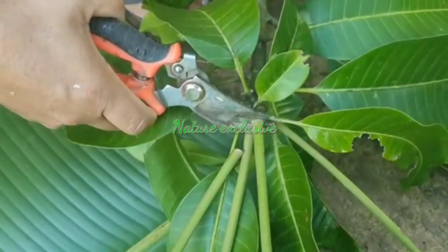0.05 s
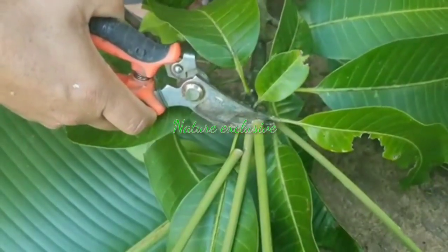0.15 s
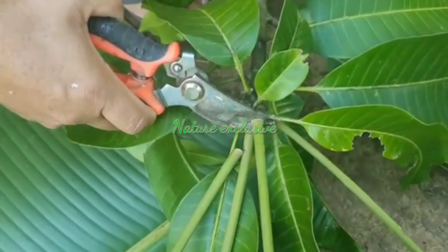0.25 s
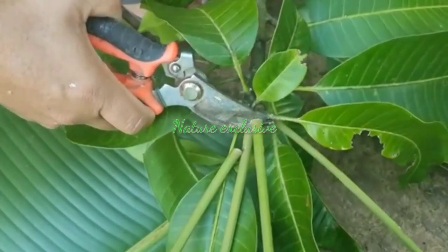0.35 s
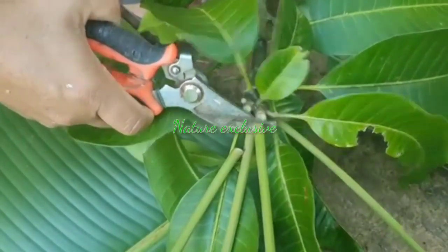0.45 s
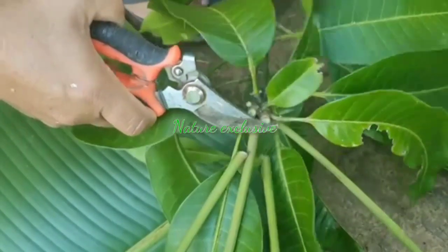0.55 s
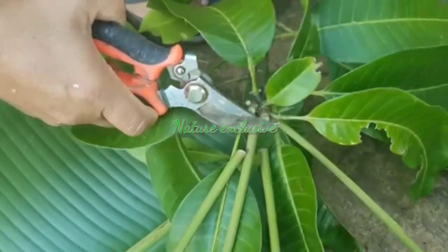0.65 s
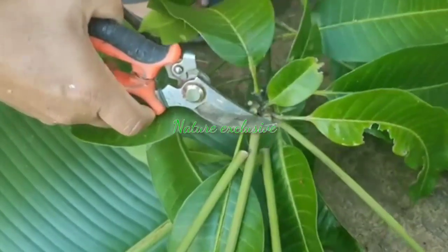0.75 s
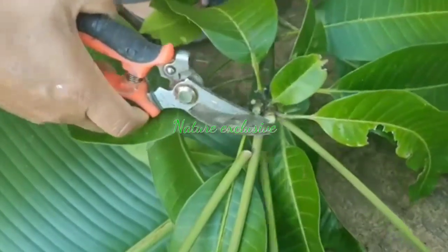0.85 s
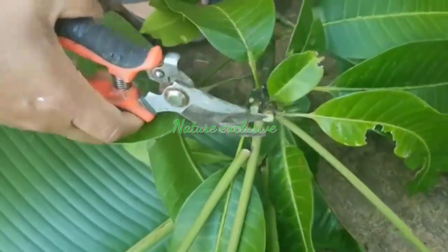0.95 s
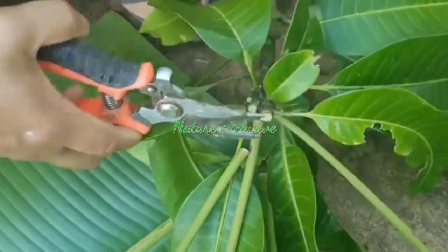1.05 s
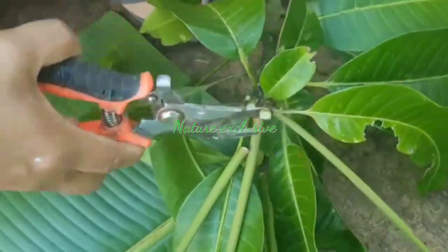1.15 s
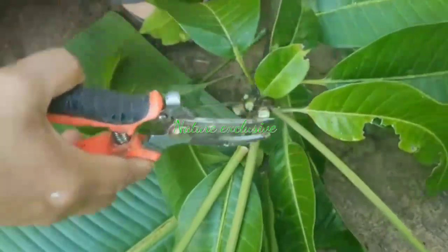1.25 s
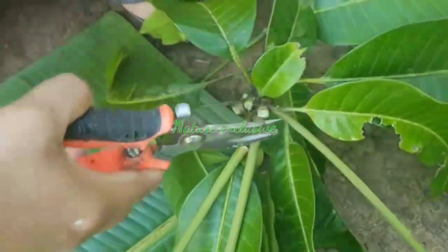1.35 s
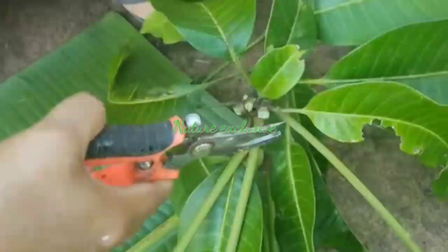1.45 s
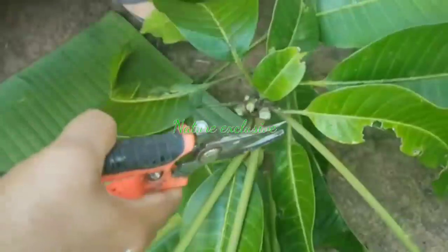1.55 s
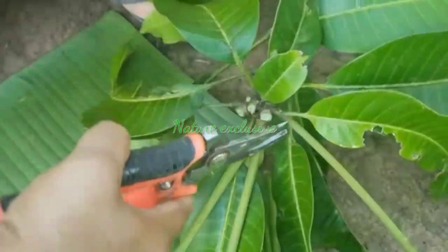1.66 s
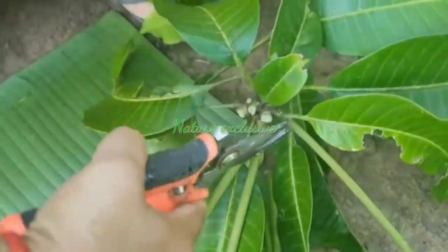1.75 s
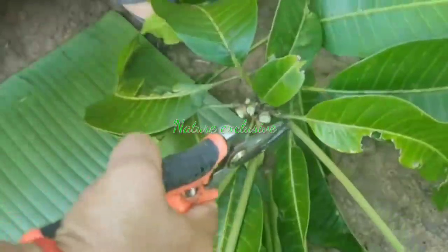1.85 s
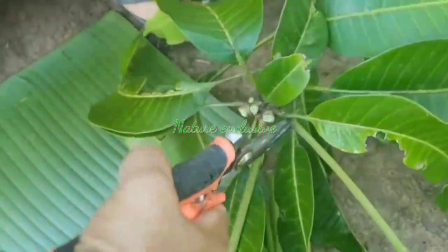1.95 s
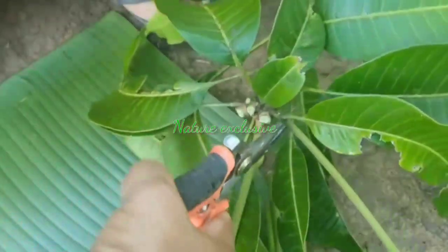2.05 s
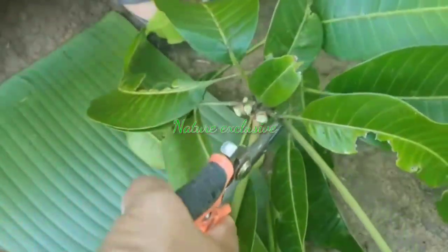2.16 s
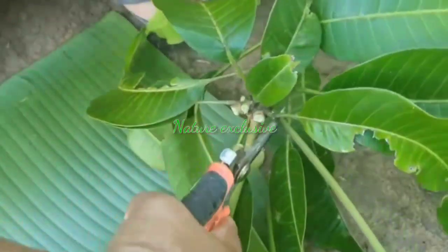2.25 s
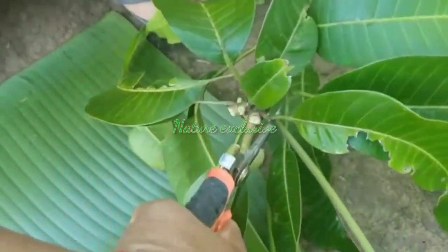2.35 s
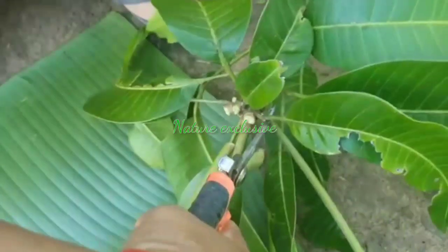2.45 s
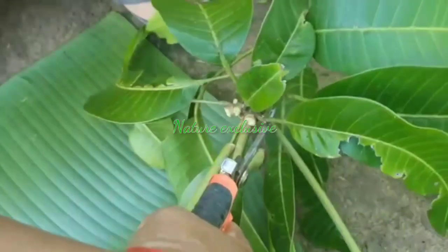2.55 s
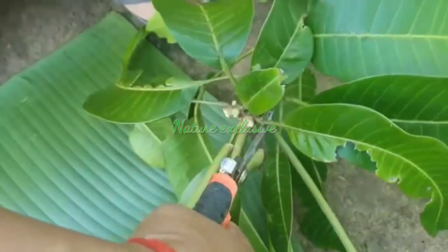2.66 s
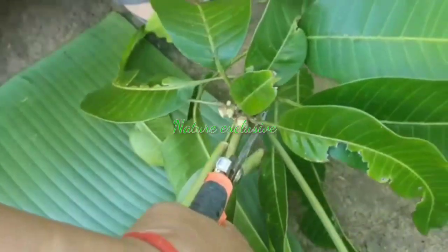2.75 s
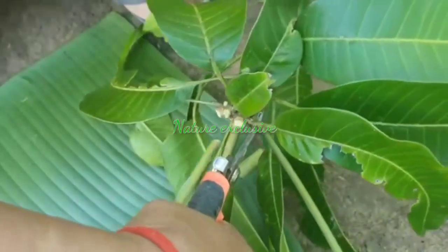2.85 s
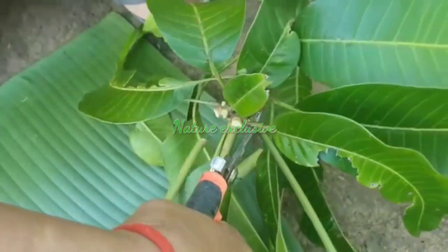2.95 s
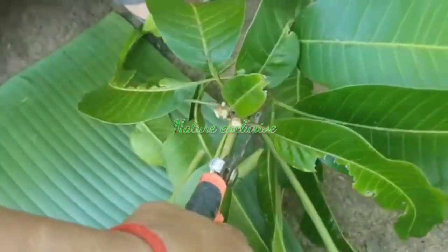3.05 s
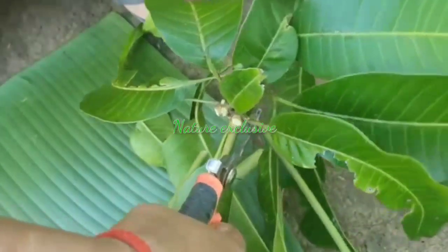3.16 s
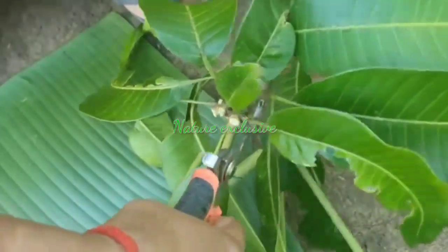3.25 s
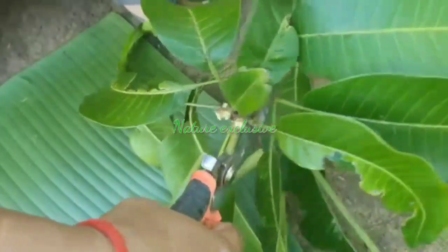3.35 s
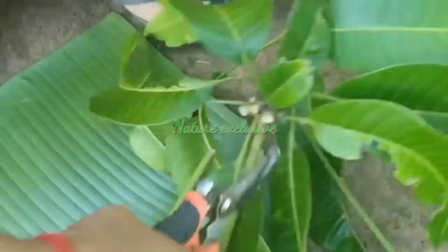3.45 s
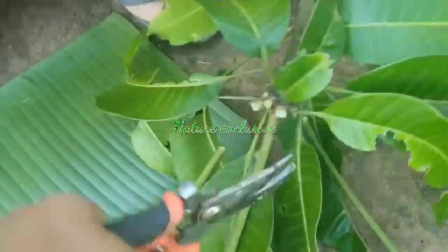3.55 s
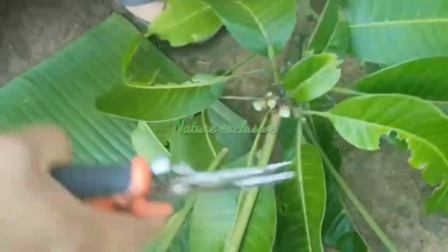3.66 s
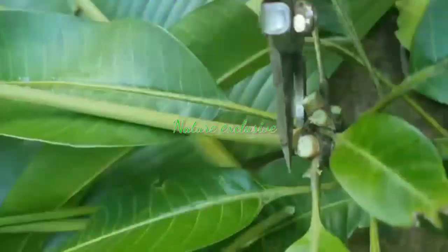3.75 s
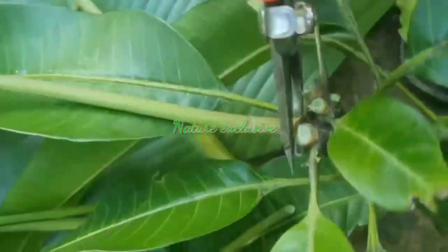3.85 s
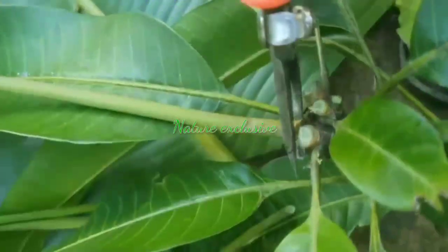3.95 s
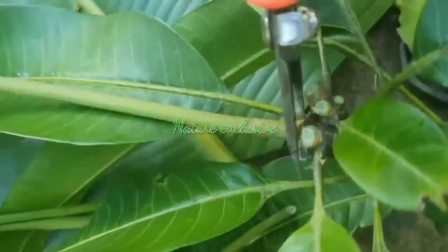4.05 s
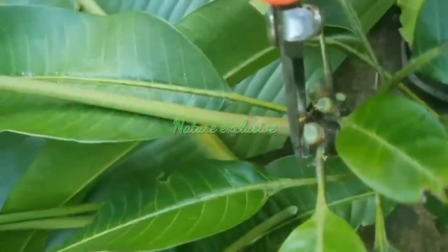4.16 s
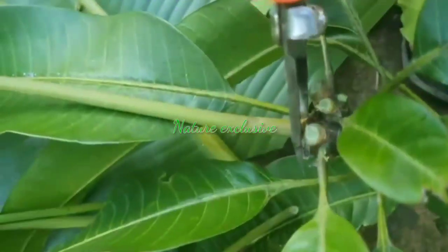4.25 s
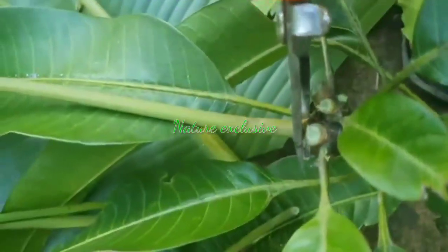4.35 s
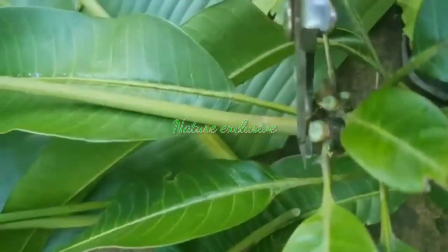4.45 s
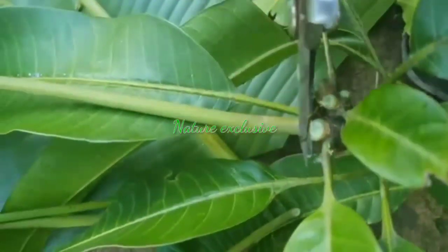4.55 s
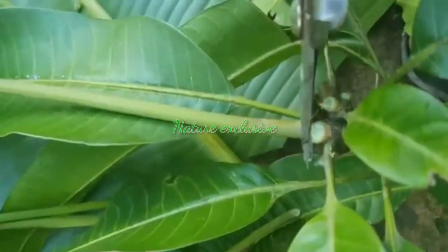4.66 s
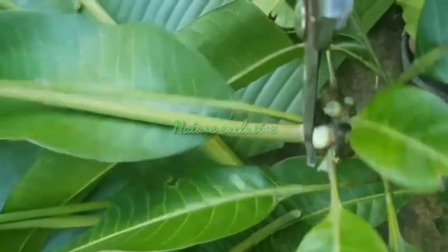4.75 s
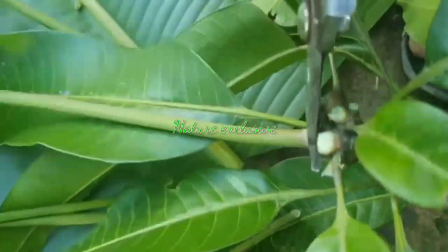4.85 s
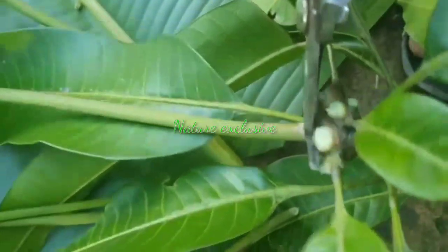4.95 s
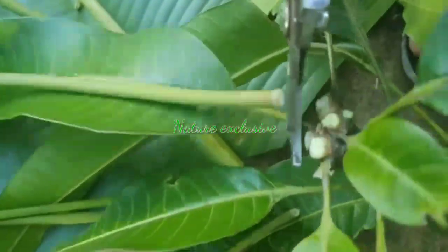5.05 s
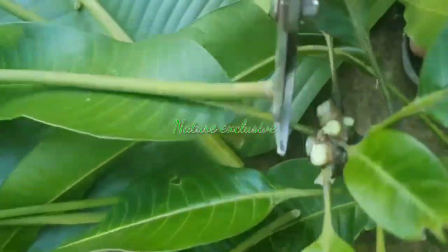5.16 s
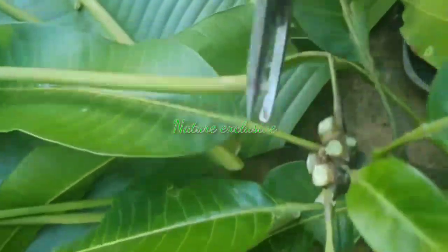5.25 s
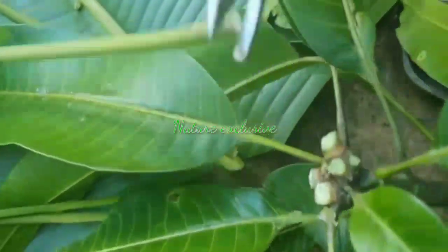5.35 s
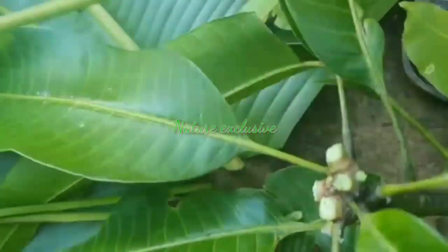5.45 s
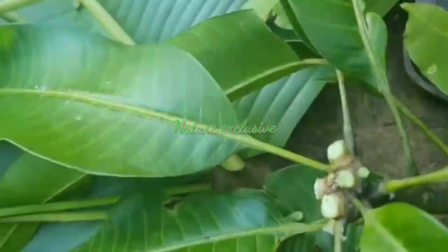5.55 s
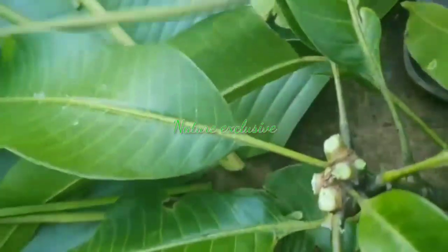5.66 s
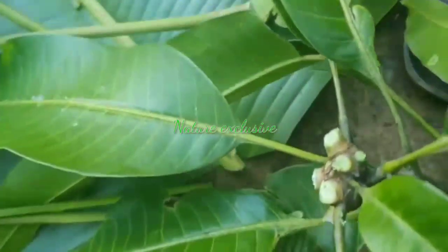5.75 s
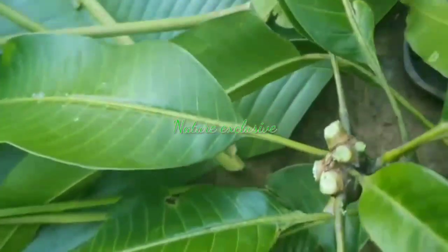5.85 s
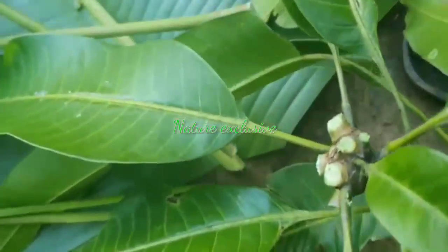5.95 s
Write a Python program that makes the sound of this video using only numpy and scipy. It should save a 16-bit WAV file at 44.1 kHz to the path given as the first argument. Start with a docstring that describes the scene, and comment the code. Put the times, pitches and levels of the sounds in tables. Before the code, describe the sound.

In an open garden, a low traffic rumble, soft air and a high insect shimmer run throughout. Two crickets pulse about five double chirps a second, near 8 kHz, with short pauses; the nearer one swells around 4 to 5.5 seconds. Small birds give quick falling slurs and thin whistles, busiest in the first four seconds, with a slight outdoor echo. At 0.56 shears crunch and snap a juicy stalk, and leaves rustle briefly. A soft thud comes near 1.0. A faint distant motorbike rises in pitch from 1.6 to 3.2. Branch knocks at 2.8 and 3.1 precede a loud, dry snap at 3.3, followed by leaf ticks and rustling until about 4. From 3.9 a far engine drones low and unevenly. A weak, longer crunch at 4.88 leads to a crisp snap at 5.09, then rustling, flicking leaves and a dull branch knock near 5.8.

```python
"""In a garden, pruning shears cut juicy leaf stalks close by: bursts of tiny impulses crush, snap and knock.
Leaves rustle as random grains of noise, and a nudged branch gives dull noise knocks.
Small birds whistle and two crickets chirp with gliding sine tones; shaped noise makes insects, air and traffic.
Far engines, a motorbike, a thin tone and soft handling thuds are sine waves with an unsteady pitch."""
import sys
import numpy as np
from scipy import signal
from scipy.fft import rfft, irfft, next_fast_len
from scipy.io import wavfile
from scipy.ndimage import uniform_filter1d, map_coordinates

SR = 44100
rng = np.random.default_rng(int(sys.argv[2]) if len(sys.argv) > 2 else 0)


def digitize_waveform(pressure):
    """Quantize a signal to 16-bit integers and store it at the path in sys.argv[1].

    Rows of a 2-D input are taken as channels; values are limited to [-1, 1].
    """
    field = np.atleast_2d(pressure).T
    bounded = np.clip(field, -1, 1)
    quanta = np.round(bounded * 32767).astype(np.int16)
    wavfile.write(sys.argv[1], SR, quanta)


N = 264600  # length in samples

# Stalks giving way. Each row: snap in seconds, level in dB, crush length in seconds, crush in dB against
# the snap, snap fall by 60 dB in seconds, knock in dB against the snap, left over right in dB.
STALK_CUTS = [(0.5637, -15.5, 0.0033, -9, 0.017, -19, 1.5), (3.3112, -9.5, 0.0015, -16, 0.018, -24.5, 1),
              (4.8765, -26, 0.00554, -3.5, 0.043, -10.5, 2.5),
              (5.086, -10, 0.003, -11.5, 0.015, -28.5, -0.5)]
# The colour of each of those stalks, one list per cut. Each row: frequency in Hz, shape in dB per Hz.
STALK_COLOURS = [
    [(120, -52), (200, -21.5), (671, -5), (1130, -18), (1540, -1.5), (1850, -14.5), (2510, -20),
     (3120, -8.5), (3670, -15), (4160, -2.5), (4720, -17.5), (5170, -13), (6420, -16), (10100, -5.5),
     (15000, -19.5)],
    [(120, -17), (250, -4), (591, -20), (980, 0), (1330, -9.5), (1690, 0.5), (2420, -20), (3170, -9.5),
     (4010, -8), (4310, -7), (5170, -7.5), (5760, 1.5), (7420, -5), (10800, 1.5), (15000, -10)],
    [(120, -28), (200, -3), (390, -31), (721, 1), (1110, -9.5), (1880, 1.5), (2210, -12), (3060, -12.5),
     (3800, -11), (4240, -16.5), (7970, -14), (12100, -16), (15000, -19)],
    [(120, -37), (200, -5), (683, -8), (946, -22), (1330, -5), (2460, -12.5), (3170, -6.5), (4090, -11),
     (4470, -2), (5660, -4), (6190, -11), (7420, -3), (9050, -11), (10500, 0.5), (15000, -9)],
]
# Broad peaks in the tone of every cut, strong and slight, each standing on a flat floor.
# Each row: frequency in Hz, width in Hz, height above the floor as a gain in dB.
CUT_PEAKS = [(655, 75, 5.5), (1477, 910, -9.5), (3160, 800, 7.5), (4160, 290, 0), (5670, 280, -17),
             (9800, 1460, -29)]
# Colour of the jolted plant. Each row: frequency in Hz, shape in dB per Hz.
KNOCK_COLOUR = [(30, -14), (70, 8.5), (220, 0), (380, 3.5), (800, -5), (1600, -11), (4000, -6),
                (14000, -15.5)]
# Small snaps of leaves and blade taps. Each row: start in seconds, snap in dB, flap in dB, before the trims.
LEAF_TICKS = [(0.579, -39, -45), (0.883, -39, -64), (2.582, -41, -59), (3.11, -39, -49.5),
              (3.124, -41, -36), (3.1452, -32, -30.5), (3.167, -47, -39), (3.3233, -42, -31.5),
              (3.442, -40, -38), (3.4813, -39, -41), (3.49, -34, -33), (3.504, -41, -49),
              (3.5557, -40, -46.5), (3.6441, -34.5, -43), (3.6633, -33.5, -43.5), (3.908, -45.5, -47),
              (3.941, -36, -48.5), (4.905, -35, -32), (4.962, -39, -52), (5.251, -55, -40),
              (5.2882, -37.5, -52), (5.383, -54, -37), (5.6628, -32.5, -45), (5.757, -50, -33.5),
              (5.7823, -41, -37), (5.7884, -47, -32.5), (5.827, -59, -47)]
# Colour of flapping leaf blades. Each row: frequency in Hz, shape in dB per Hz.
FLAP_COLOUR = [(150, -9.5), (350, -3.5), (700, 1), (1600, 0.5), (2800, -5.5), (5000, -15.5), (10000, -54)]
# Colour of crackling leaf edges. Each row: frequency in Hz, shape in dB per Hz.
CRACKLE_COLOUR = [(800, -24), (2500, 4.5), (4000, 2.5), (6000, 1.5), (9000, -2.5), (12000, 2.5),
                  (15000, -3.5)]
# A leaf is pushed, slides and comes to rest. Each row: peak in seconds, rise and fall over 20 dB in
# seconds, flap in dB, crackle in dB, before the trims.
LEAF_RUSTLES = [(.585, 0.02, 0.13, -46.5, -48), (.645, 0.068, 0.17, -49, -55.5),
                (.70, 0.034, 0.11, -52.5, -56.5), (1.03, 0.14, 0.21, -58.5, -68),
                (3.145, 0.061, 0.054, -48, -55.5), (3.28, 0.2, 0.018, -62.5, -57.5),
                (3.34, 0.018, 0.17, -59, -70), (3.499, 0.148, 0.11, -48.5, -47),
                (3.62, 0.23, 0.33, -55, -59.5), (3.955, 0.091, 0.25, -53.5, -58.5),
                (4.53, 0.039, 0.072, -63.5, -57.5), (4.62, 0.12, 0.13, -58.5, -73),
                (4.896, 0.0136, 0.19, -44, -45.5), (4.96, 0.14, 0.065, -51, -56),
                (5.115, 0.0165, 0.16, -52, -58), (5.27, 0.099, 0.19, -53.5, -57),
                (5.4, 0.0415, 0.042, -45.5, -53.5), (5.675, 0.18, 0.061, -52.5, -49.5),
                (5.793, 0.048, 0.0241, -49, -46.5)]
BRUSH_DB = -72.5  # leaves brushed by the arm all along
# The tool bumps a branch. Each row: start in seconds, peak of the envelope in dB.
BRANCH_BUMPS = [(2.799, -48.5), (3.121, -45.5), (5.785, -41)]
# Colour of the bumped branch. Each row: frequency in Hz, shape in dB per Hz.
BRANCH_COLOUR = [(40, -24), (100, -16), (250, 1), (420, 1), (800, -14), (2000, -52)]
# Soft handling thuds. Each row: peak in seconds, length in seconds, level in dB.
HANDLING_THUDS = [(.2, 0.092, -53), (.49, 0.15, -47.5), (.98, 0.089, -40.5), (2.87, 0.11, -45.5),
                  (3.35, 0.13, -54)]
THUD_HZ = 65

# Quick falling bird slurs. Each row: start in seconds, length in seconds, end pitch in Hz, lateness of
# the swell (1 peaks midway), level in dB before the bird trim.
BIRD_SLURS = [(0.058, 0.045, 2400, 1.4, -52.5), (0.263, 0.04, 2080, 0.95, -58),
              (0.601, 0.088, 2494, 1.8, -52), (0.775, 0.039, 2320, 2, -50), (0.911, 0.093, 1920, 1.46, -51),
              (0.939, 0.05, 2600, 0.81, -53.5), (1.457, 0.048, 2430, 1.3, -58),
              (1.605, 0.067, 2070, 0.96, -55), (1.932, 0.12, 2175, 1.9, -50),
              (2.219, 0.082, 2060, 1.63, -47.5), (2.579, 0.078, 3075, 1.3, -57),
              (2.779, 0.034, 3630, 0.88, -54), (2.844, 0.064, 3000, 1.7, -51),
              (3.635, 0.1, 2087, 2.3, -48.5)]
SLUR_TOP_HZ = 4750  # every slur starts here
# Slow whistles that hold, then sag. Each row: start in seconds, length in seconds, pitch in Hz, sag as a
# share of the pitch, level in dB before the bird trim.
BIRD_WHISTLES = [(-.04, 0.11, 3270, 0.11, -60), (-.03, .11, 2166, 0.21, -62),
                 (0.189, 0.085, 3265, 0.033, -57.5), (.28, 0.11, 3145, 0.21, -62.5),
                 (0.471, 0.076, 3450, 0.073, -62.5), (1.436, 0.1386, 3166, 0.032, -60),
                 (1.553, 0.079, 3134, 0.12, -58.5), (1.428, 0.044, 4450, .09, -65),
                 (1.756, 0.08, 4620, 0.025, -62), (1.812, 0.12, 3404, 0.24, -59),
                 (1.99, 0.18, 4120, 0.23, -65), (2.289, 0.061, 4250, 0.063, -57.5),
                 (2.354, 0.054, 3750, 0.21, -58), (2.485, 0.11, 4656, 0.091, -61),
                 (2.607, 0.062, 3294, 0.018, -56), (2.754, 0.12, 4550, 0.052, -58),
                 (2.892, 0.19, 3260, 0.11, -63.5), (3.235, 0.107, 3283, 0.0196, -62),
                 (3.356, 0.089, 3310, 0.27, -52), (3.736, 0.13, 4315, 0.17, -59),
                 (3.854, .062, 3570, 0.11, -54), (3.947, 0.084, 4290, 0.014, -59.5),
                 (4.049, 0.055, 3406, 0.043, -49.5), (4.772, 0.098, 3205, 0.0085, -61),
                 (5.124, 0.097, 3443, 0.057, -58), (5.301, 0.022, 3560, 0.023, -50),
                 (5.836, 0.18, 3224, 0.22, -59)]
WHISTLE_BEND = 1.7  # power of time by which the pitch sags
BIRD_WAVER, BIRD_RASP = .007, .016  # unsteadiness as a share of the pitch: always, and added on slides
BIRD_TRIM_DB = -1.5
BIRD_ECHO_DB = -8  # the birds sit farther off than the crickets, so the yard answers them more

# The near cricket's evenly spaced double chirps. Each row: first chirp in seconds, last chirp in seconds.
NEAR_RUNS = [(.079, .691), (.936, 1.546), (1.878, 1.878), (2.036, 2.242), (2.53, 2.53), (2.775, 3.178),
             (3.638, 3.838), (4.023, 5.83)]
# The same for its neighbour. Each row: first chirp in seconds, last chirp in seconds.
NEIGHBOUR_CHIRP_RUNS = [(.138, .344), (.597, 2.044), (2.376, 3.83), (4.089, 4.913), (5.164, 5.791)]
CHIRP_PERIOD_S, STROKE_GAP_S = .205, .047
NEAR_CRICKET_HZ, NEIGHBOUR_HZ = 8245, 7830  # top of each stroke's pitch arch
CRICKET_DB, NEIGHBOUR_DB = -54.5, -60.5
# The near cricket is heard louder for a while. Each row: peak in seconds, length in seconds, added level in dB.
NEAR_SWELL = [(4.7, 2, -56)]

# The motorbike idles, then speeds up in two pulls. Each row: time in seconds, pitch in Hz, level in dB.
MOTORBIKE = [(1.5, 180, -80), (1.6, 181, -67), (1.8, 183, -57.5), (1.89, 232, -59.5), (2.04, 275, -63.5),
             (2.18, 296, -61), (2.32, 315, -80), (2.57, 352, -65), (2.7, 402, -70), (2.87, 456, -60),
             (3.08, 463, -64), (3.2, 465, -83)]
# A lower hum sinks away. Each row: time in seconds, pitch in Hz, level in dB.
SINKING_HUM = [(2.84, 199.3, -77), (2.92, 194.1, -58), (3.17, 165, -65), (3.3, 160, -87)]
# The far engine comes under load. Each row: time in seconds, pitch in Hz, level in dB before the load trim.
ENGINE_DRONE = [(3.88, 65, -76), (3.96, 65.9, -47.5), (4.04, 66.7, -41.5), (4.19, 66.6, -51.5),
                (4.31, 67.15, -48), (4.41, 65.9, -54), (4.48, 66.7, -44), (4.68, 66.4, -44.5),
                (4.81, 66.96, -52), (4.92, 67.36, -45), (5.03, 69.05, -42), (5.12, 74.16, -49.5),
                (5.22, 67.75, -55), (5.4, 65.24, -49), (5.48, 65.5, -44.5), (5.59, 65.3, -51.5),
                (5.69, 65.5, -41.5), (6.0, 65.35, -54)]
DRONE_IDLE_DB = -60.5  # until the first row of that table
# The drone's pitch and its overtones at 1, 1.5, 2 .. times. Each entry: level in dB against the drone.
DRONE_OVERTONES = [0, -11, -14, -23, -20, -22.5, -23, -22.5]

TONE_HZ = 1800
# A thin far tone. Each row: peak in seconds, length in seconds, level in dB.
FAR_TONE_SWELLS = [(4.45, 1.8, -74), (5.41, 0.22, -58.5)]
# Colour of the insect chorus. Each row: frequency in Hz, shape in dB per Hz.
INSECT_COLOUR = [(6000, -17.5), (7400, -2.5), (8250, 4.5), (9100, -2), (9900, -11.5), (10600, -2),
                 (11600, 6.5), (12400, -3), (13300, -35), (15000, -15)]
INSECT_DB = -59.5
# The chorus swells. Each row: peak in seconds, length in seconds, added level in dB.
CHORUS_SWELLS = [(4.58, 0.36, -64)]
# Colour of the open air. Each row: frequency in Hz, shape in dB per Hz.
AIR_COLOUR = [(200, -7.5), (400, -4.5), (700, -2), (1400, -6.5), (2200, -5.5), (3100, -5), (5500, -13.5),
              (10000, -19), (15000, -27.5)]
# How the open air rises and falls. Each row: time in seconds, level in dB before the air trim.
AIR_LEVEL = [(0.0, -71), (0.53, -71), (0.72, -67), (2.16, -64), (2.56, -70), (3.11, -65.5), (3.46, -57.5),
             (4.31, -75), (4.91, -66), (5.05, -58.5), (5.6, -61.5), (6.0, -68.5)]
# Colour of far traffic. Each row: frequency in Hz, shape in dB per Hz.
TRAFFIC_COLOUR = [(20, -27.5), (32, -13), (45, 7), (75, 2), (130, -3.5), (250, -6.5), (340, -14),
                  (500, -25.5), (1000, -36)]
# How the traffic rises and falls. Each row: time in seconds, level in dB before the traffic trim.
TRAFFIC_CURVE = [(0.0, -60), (0.32, -62), (1.7, -60), (2.15, -60.5), (2.59, -62), (4.66, -58), (6.0, -60)]

# Likeness of left and right. Each row: frequency in Hz, likeness (1 the same, 0 unrelated).
WIDE_ALIKE = [(60, 0.97), (150, 0.87), (500, 0.53), (1500, 0.069), (8000, 0)]
# The same for the work next to the microphone. Each row: frequency in Hz, likeness.
NEAR_ALIKE = [(60, 0.46), (700, 0.63), (1500, 0.31), (8000, 0)]
# How fast the yard's echo dies. Each row: frequency in Hz, time to fall by 60 dB in seconds.
YARD_DECAY = [(200, 0.34), (3000, 0.33), (12000, 0.092)]
FOLIAGE_DB, ECHO_DB = -3.5, -6  # early copies and yard echo of the animals
TOP_HZ = 15150  # band limit of the microphone chain


def amp(db):
    """Turn decibels into gain."""
    return 10 ** (np.asarray(db) / 20)


def unit(x):
    """Scale to rms 1 (rms is a kind of average strength)."""
    return x / np.sqrt(np.mean(x ** 2) + 1e-20)


def decay(t, t60):
    """A dying-away curve that falls by 60 dB in t60 seconds."""
    return np.exp(-np.log(1000) * t / t60)


def along(points, hz):
    """Read (Hz, value) points at any frequency, on a log axis."""
    f, v = np.transpose(points)
    return np.interp(np.log(hz + 1), np.log(f + 1), v)


def curves(rows):
    """One value per sample for each column after the time."""
    s, *cols = np.transpose(rows)
    return [np.interp(np.arange(N) / SR, s, c) for c in cols]


def wobble(rate):
    """A smooth random curve through about rate random values a second."""
    knots = np.arange(0, N * rate / SR + 1, .125)
    values = map_coordinates(rng.standard_normal(int(knots[-1]) + 4), [knots])
    return np.interp(np.arange(N) * rate / SR, knots, values)


def swells(rows):
    """Gain of smooth rises and falls, from rows of peak time, length and dB."""
    t = np.arange(N) / SR
    return sum(amp(db) * np.cos(np.pi * np.clip((t - s) / length, -.5, .5)) ** 2 for s, length, db in rows)


def cycles(hz):
    """Phase of a moving pitch: the cycles so far, as an angle."""
    return 2 * np.pi * np.cumsum(hz) / SR


def add(track, s, sound):
    """Mix a sound into a track at time s, cutting off what lies outside."""
    start = round(s * SR)
    first, last = max(start, 0), min(start + sound.shape[-1], N)
    track[..., first:last] += sound[..., first - start:last - start]


def coloured(x, gain, size=8192):
    """Filter with the given gain at each frequency, never sounding ahead of its input."""
    cepstrum = irfft(np.log(np.maximum(gain(np.fft.rfftfreq(size, 1 / SR)), 1e-6)))
    # folding the second half onto the first gives a minimum-phase filter
    cepstrum[1:size // 2] *= 2
    cepstrum[size // 2 + 1:] = 0
    response = irfft(np.exp(rfft(cepstrum)))[:size // 2]
    return signal.oaconvolve(np.atleast_2d(x), response[None], axes=1)[:, :x.shape[-1]].reshape(x.shape)


def spread(pair, spectrum, alike=WIDE_ALIKE):
    """Two unrelated signals become coloured stereo of rms 1, most alike where the table says."""
    turn = lambda hz: np.arccos(np.clip(along(alike, hz), -.99, .99)) / 2
    mid = coloured(pair[0], lambda hz: amp(along(spectrum, hz)) * np.cos(turn(hz)))
    side = coloured(pair[1], lambda hz: amp(along(spectrum, hz)) * np.sin(turn(hz)))
    return unit(np.array([mid + side, mid - side]))


def rush(spectrum):
    """Steady stereo noise."""
    return spread(rng.standard_normal((2, N)), spectrum)


def patchy(x, depth_db, size):
    """Colour that keeps shifting: short-lived patches of random gain, size frames long; rms 1."""
    z = signal.stft(x, nperseg=512)[2]
    patches = uniform_filter1d(rng.standard_normal(z.shape[1:]), size=5, axis=0)
    patches = unit(uniform_filter1d(patches, size=size, axis=1))
    return unit(signal.istft(z * amp(depth_db * patches), nperseg=512)[1][:, :N])


def burst(envelope, spectrum):
    """Tearing fibres: dense tiny impulses of either sign under an envelope."""
    fibres = np.sign(rng.standard_normal((2, len(envelope)))) * envelope
    return spread(fibres, spectrum, NEAR_ALIKE) * np.sqrt(np.mean(envelope ** 2))


def cut_tone(x, floor):
    """The same broad peaks over a flat floor colour each cut without changing its energy."""
    tone = lambda f: floor + sum(amp(db) / (1 + (2 * (f - hz) / width) ** 2)
                                 for hz, width, db in CUT_PEAKS)
    return unit(coloured(x, tone)) * np.sqrt(np.mean(x ** 2))


def cuts(rise_s=0.00024, knock_t60=0.17):
    """The blade crushes the stalk, breaks through with a snap and jolts the plant."""
    out = np.zeros((2, N))
    lead = .02  # seconds kept ahead of the snap for the crush
    t = np.arange(SR // 4) / SR - lead
    before, after = np.maximum(-t, 0), np.maximum(t, 0)
    for (s, db, crush_s, crush_db, t60, knock_db, pan_db), stalk in zip(STALK_CUTS, STALK_COLOURS):
        crush = amp(crush_db) * (t < 0) * np.exp(-np.maximum(before - crush_s, 0) / rise_s)
        snap = np.exp(-before / rise_s) * decay(after, t60)
        # fibres tear for a few milliseconds, then the blades close all at once
        crack = cut_tone(burst(np.maximum(crush, snap), stalk), floor=1.34)
        knock = burst(amp(knock_db) * (t > 0) * decay(after, knock_t60), KNOCK_COLOUR)
        left_right = amp([[pan_db / 2], [-pan_db / 2]])
        add(out, s - lead, amp(db) * left_right * (crack + knock))
    return out


def grains(spectrum, rate, spread_db, smooth):
    """Leaf surfaces catching and slipping: rate random impulses a second over a smooth rub."""
    slips = (rng.random(N) < rate / SR) * amp(spread_db * np.clip(rng.standard_normal(N), -2, 2))
    impulses = unit(slips * rng.standard_normal((2, N)))
    return spread(impulses + smooth * rng.standard_normal((2, N)), spectrum)


def shiver(level_db=-33, t60=0.36):
    """After each snap the freed leaf trembles against its neighbours and settles."""
    tremble, t = np.zeros(N), np.arange(SR // 2) / SR
    for s, db, *_ in STALK_CUTS:
        add(tremble, s, amp(db + level_db) * decay(t, t60))
    return tremble * grains(CRACKLE_COLOUR, rate=1100, spread_db=6, smooth=0.6)


def ticks(snap_trim_db=-5, snap_t60=0.044, flap_trim_db=-4, flap_t60=0.045):
    """Stiff leaves flick past the blade: a bright snap and a duller flap."""
    out, t = np.zeros((2, N)), np.arange(SR // 10) / SR
    for s, snap_db, flap_db in LEAF_TICKS:
        add(out, s, amp(snap_db + snap_trim_db) * burst(decay(t, snap_t60), CRACKLE_COLOUR))
        add(out, s, amp(flap_db + flap_trim_db) * burst(decay(t, flap_t60), FLAP_COLOUR))
    return out


def bumps(t60=0.094):
    """A nudged branch answers with a dull, quickly damped knock."""
    out, t = np.zeros((2, N)), np.arange(SR // 5) / SR
    for s, db in BRANCH_BUMPS:
        add(out, s, amp(db) * burst(decay(t, t60), BRANCH_COLOUR))
    return out


def leaves(flap_trim_db=0, crackle_trim_db=5, jerk_db=0.7):
    """Leaves slide over each other in uneven little jerks, and never keep quite still."""
    t = np.arange(N) / SR
    flap_power, crackle_power = np.zeros((2, N))
    for s, rise_s, fall_s, flap_db, crackle_db in LEAF_RUSTLES:
        motion_db = -20 * np.minimum(np.maximum((s - t) / rise_s, (t - s) / fall_s), 10)
        power = amp(motion_db) ** 2
        flap_power += amp(flap_db) ** 2 * power
        crackle_power += amp(crackle_db) ** 2 * power
    jerks = amp(jerk_db * wobble(90))
    flap = jerks * np.sqrt(flap_power) * amp(flap_trim_db + 1.3 * wobble(70))
    brush = amp(BRUSH_DB + 3.6 * wobble(17))
    crackle = jerks * np.sqrt(crackle_power) * amp(crackle_trim_db) + brush
    blades = patchy(grains(FLAP_COLOUR, rate=520, spread_db=4, smooth=0.45), depth_db=3.5, size=5)
    edges = patchy(grains(CRACKLE_COLOUR, rate=720, spread_db=4.3, smooth=0.55), depth_db=3.5, size=5)
    return flap * blades + crackle * edges


def handling():
    """Soft handling thuds: a few cycles of an unsteady low sine each time."""
    return swells(HANDLING_THUDS) * np.sin(cycles(THUD_HZ * (1 + 0.054 * wobble(28.67))))


def bird_note(pitch, swell):
    """A thin whistle along a pitch path; fast slides are slightly raspy."""
    slide = np.minimum(np.abs(np.gradient(pitch)) * SR / 15000, 1.5)  # 1 means 15000 Hz a second
    unsteady = np.interp(np.arange(len(pitch)) / SR, np.arange(600) / 1200, rng.standard_normal(600))
    shaken = pitch * (1 + (BIRD_WAVER + BIRD_RASP * slide) * unsteady)
    return np.abs(swell) ** .5 * np.sin(cycles(shaken))


def birds(flutter_db=4.0):
    """Slurs drop evenly in musical steps; whistles hold, then sag."""
    out = np.zeros(N)
    for s, length, end_hz, late, db in BIRD_SLURS:
        u = np.linspace(0, 1, int(length * SR))
        pitch = SLUR_TOP_HZ * (end_hz / SLUR_TOP_HZ) ** u
        add(out, s, amp(db) * bird_note(pitch, np.sin(np.pi * u ** late) ** 2))
    for s, length, hz, sag, db in BIRD_WHISTLES:
        u = np.linspace(0, 1, int(length * SR))
        pitch = hz * (1 - sag * u ** WHISTLE_BEND)
        add(out, s, amp(db) * bird_note(pitch, np.sin(np.pi * u)))
    return out * amp(flutter_db * wobble(90))


def wing_stroke(hz, length, sag):
    """One scrape of a cricket's file: the pitch arches as the wing speeds up and slows, never twice alike."""
    u = np.linspace(0, 1, int(length * SR))
    pitch = hz * (1 - sag * (2 * u - .85) ** 2) * (1 + 0.001 * rng.standard_normal())
    return amp(rng.standard_normal()) * np.sin(np.pi * u) * np.sin(cycles(pitch))


def cricket(runs, hz, length, sag, second_db=1):
    """Two wing strokes to a chirp, about five chirps a second, in runs with pauses."""
    out = np.zeros(N)
    for first, last in runs:
        for s in np.linspace(first, last, round((last - first) / CHIRP_PERIOD_S) + 1):
            for k in range(2):
                stroke = amp(k * second_db) * wing_stroke(hz, length, sag)
                add(out, s - length / 2 + k * STROKE_GAP_S, stroke)
    return out * amp(1.4 * wobble(160))


def crickets():
    """A near cricket and a lower, softer neighbour each scrape out their own runs of chirps."""
    near = cricket(NEAR_RUNS, hz=NEAR_CRICKET_HZ, length=.028, sag=0.0373)
    near *= amp(CRICKET_DB) + swells(NEAR_SWELL)
    neighbour = cricket(NEIGHBOUR_CHIRP_RUNS, hz=NEIGHBOUR_HZ, length=.036, sag=0.016)
    return near + amp(NEIGHBOUR_DB) * neighbour


def far_motor(rows, waver=0.0265, flutter_db=4, second_db=-14):
    """A distant motor's note and its octave, fluttering on the way here."""
    s, hz, db = np.transpose(rows)
    t = np.arange(N) / SR
    revs = cycles(np.interp(t, s, hz) * (1 + waver * wobble(38)))
    gain = amp(np.interp(t, s, db) + flutter_db * wobble(23.94)) * (t > s[0]) * (t < s[-1])
    return gain * (np.sin(revs) + amp(second_db) * np.sin(2 * revs))


def engine_drone(load_trim_db=0.5):
    """A low engine note with overtones in half steps, louder or softer as the load changes."""
    drone_hz, load_db = curves(ENGINE_DRONE)
    firing = cycles(drone_hz * (1 + 0.00765 * wobble(12)))
    idling = np.arange(N) / SR < ENGINE_DRONE[0][0]
    drone_db = np.where(idling, DRONE_IDLE_DB, load_db + load_trim_db)
    notes = np.zeros(N)
    for k, db in enumerate(DRONE_OVERTONES):
        loose = min(k, 1)  # the lowest note is firm; its overtones flutter
        level = amp(db + loose * 4.4 * wobble(12))
        notes += level * np.sin((1 + k / 2) * firing + loose * 1.16 * wobble(14))
    return amp(drone_db) * notes


def engines():
    """A low engine drone, a motorbike gathering speed, a sinking hum and a faint wavering one."""
    drone = engine_drone()
    hum = amp(-59.5 + 1.5 * wobble(7.06)) * np.sin(cycles(49 + 1.48 * wobble(6.2)))
    return drone + far_motor(MOTORBIKE) + far_motor(SINKING_HUM) + hum


def far_tone():
    """A faint wavering whistle, one unsteady sine, comes and goes."""
    whistle = np.sin(cycles(TONE_HZ * (1 + 0.00817 * wobble(120))))
    return swells(FAR_TONE_SWELLS) * amp(3.1 * wobble(40)) * whistle


def garden(traffic_trim_db=5, air_trim_db=4):
    """Distant traffic, patchy moving air and a high chorus of insects, all shaped noise."""
    traffic_db = curves(TRAFFIC_CURVE)[0] + traffic_trim_db + 2.0 * wobble(8)
    traffic = amp(traffic_db) * rush(TRAFFIC_COLOUR)
    chorus_gain = amp(INSECT_DB) + swells(CHORUS_SWELLS)
    chorus = chorus_gain * amp(0.88 * wobble(14) + 0.27 * wobble(2.04)) * rush(INSECT_COLOUR)
    air_gain = amp(curves(AIR_LEVEL)[0] + air_trim_db)
    air = air_gain * patchy(rush(AIR_COLOUR), depth_db=5.0, size=9)
    return traffic + chorus + air


def foliage(x, count=8):
    """Nearby leaves and walls return a few early copies, different at each ear."""
    out = np.zeros((2, N))
    for ear in range(2):
        for delay, gain in rng.random((count, 2)):
            add(out[ear], .025 * delay, (2 * gain - 1) * x / np.sqrt(count / 3))  # up to 25 ms late
    return out


def yard(x):
    """Scatter from walls and foliage; each frequency dies at its own speed."""
    hz, t, z = signal.stft(rng.standard_normal((2, SR // 2)), SR, nperseg=256)
    tail = signal.istft(z * decay(t, along(YARD_DECAY, hz)[:, None]), SR, nperseg=256)[1]
    tail = tail / np.linalg.norm(tail[0])
    return signal.fftconvolve(np.float32(np.atleast_2d(x)), np.float32(tail), axes=1)[:, :N]


def outdoors(x):
    """An animal's call arrives directly, off the foliage and from the yard."""
    return x + amp(FOLIAGE_DB) * foliage(x) + amp(ECHO_DB) * yard(x)


def scene():
    """Close work is nearly dry; the animals are heard through the foliage and the yard."""
    work = cuts() + shiver() + ticks() + bumps() + leaves()
    song = amp(BIRD_TRIM_DB) * birds()
    animals = outdoors(song + crickets()) + amp(BIRD_ECHO_DB) * yard(song + foliage(song))
    return work + amp(-15.5) * yard(work) + animals + far_tone() + engines() + handling() + garden()


def record(dry):
    """The microphone chain cuts very steeply above its band limit."""
    m = next_fast_len(N + SR // 2)
    hz = np.fft.rfftfreq(m, 1 / SR)
    return irfft(rfft(dry, m) / (1 + (hz / TOP_HZ) ** 120), m)[:, :N]


dry = scene()
out = record(dry)
digitize_waveform(out)
```